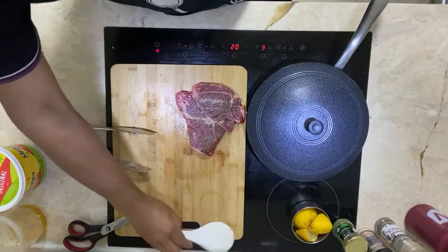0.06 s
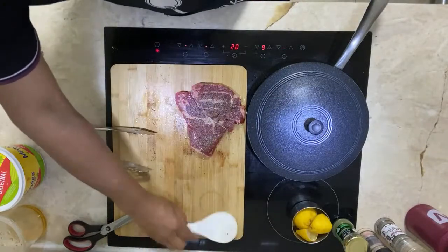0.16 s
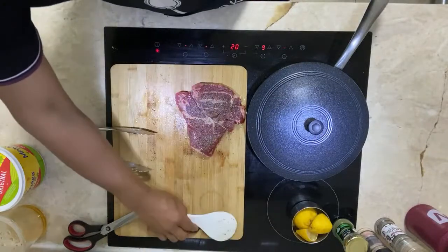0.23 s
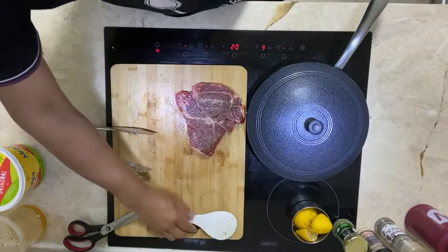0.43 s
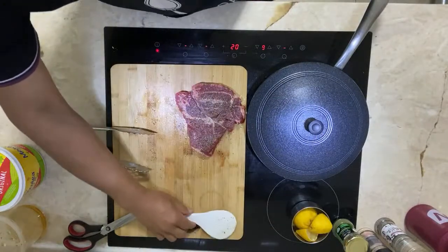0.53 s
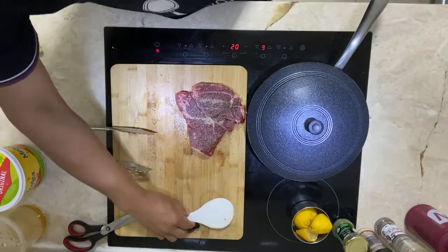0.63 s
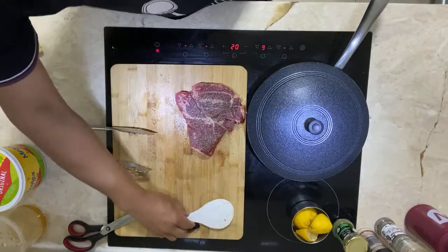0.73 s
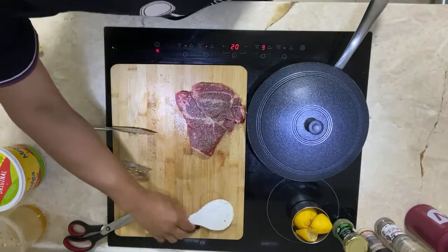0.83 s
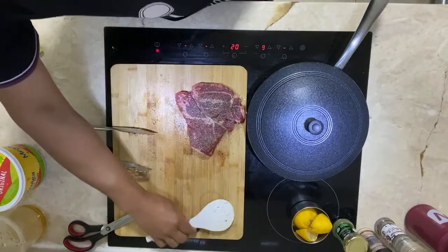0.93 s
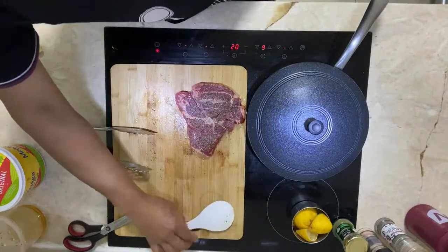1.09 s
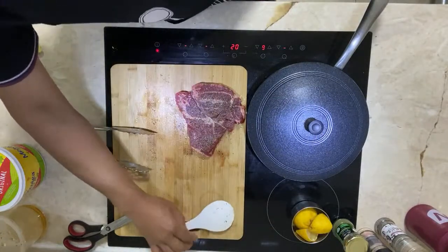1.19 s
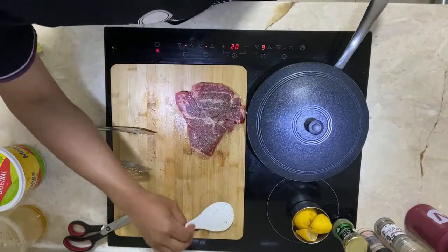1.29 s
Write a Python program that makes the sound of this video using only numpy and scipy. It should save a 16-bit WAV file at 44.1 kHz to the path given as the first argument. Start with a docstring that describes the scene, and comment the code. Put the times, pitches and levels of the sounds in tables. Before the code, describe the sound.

Steady oil sizzle with crackles and bright pops from a covered wok; nearby, a plastic spoon clacks and rattles on a wooden board early and again late. Small hard-walled kitchen, fan noise, thin narrow-band microphone.

```python
"""Wok and spoon in a small kitchen

Hot oil sizzles in a lidded wok: a dense fizz and simmer of tiny swelling pings, dry crackle, and larger
pitched pops with a noisy spit. Beside it a hand shifts a plastic spoon on a wooden cutting board, which
clacks twice and rattles briefly: contacts and slips shake a set of decaying modes.
Early echoes and a short tail off the hard walls lie over fan noise, hiss and a faint hum from the
cooker's fan; the microphone has little bass and a narrow band."""
import sys
import numpy as np
from scipy import signal
from scipy.fft import rfft, irfft
from scipy.io import wavfile

SR = 44100
rng = np.random.default_rng(int(sys.argv[2]) if len(sys.argv) > 2 else 0)


def file_out(sig):
    """Save sig as 16-bit WAV at sys.argv[1]."""
    # one column per channel
    cols = np.atleast_2d(sig).T
    # limit, then scale
    lim = np.clip(cols, -1, 1)
    pcm = np.round(lim * 32767).astype(np.int16)
    wavfile.write(sys.argv[1], SR, pcm)


N = 59535  # length in samples

# how hard the oil boils, for fizz and crackle alike: [t/s, level/dB]
BOIL = [(0, -5.5), (.03, -5), (.045, 1), (.14, -3.5), (.19, 3.5), (.3, -0.5), (.375, -3), (.4, 2.5),
        (.47, 1.5), (.49, -8.5), (.55, 3.5), (.61, -6.5), (.7, 0.5), (.8, -1), (.89, -9.5), (1, 2.5),
        (1.12, 0), (1.35, -6)]
# colour of oil-film snaps and spits: [f/Hz, level/dB]
FILM_COLOUR = [(300, -20), (1500, -12), (2400, -16.5), (4000, 2), (5200, 0), (6400, -6.5), (7500, -3.5),
               (9000, -14)]
# what spoon and board ring with: [f/Hz, level/dB, t60/s]
BOARD_MODES = [(182, -41, 0.1), (300, -35.5, 0.025), (443.3, -23.5, .05), (627, -22, 0.024),
               (809, -21, 0.023), (1073, -22, 0.028), (1355, -20.5, 0.023), (1556, -14.5, 0.017),
               (1855, -11, 0.0081), (1956, -1, 0.0096), (2216, -8.5, 0.019), (2450, -19, .025),
               (2910, -12, .014), (3155, -0.5, 0.0082), (4106, -13, .012), (4586, -17.5, 0.0087),
               (5930, -11, 0.0056), (6820, -27.5, 0.014)]


def pops():
    """Each large bubble tears open with a short spit and gives one slightly rising ping."""
    # larger bubbles bursting in the oil: [t/s, f/Hz at the top of the swell, level/dB]
    bursts = [(.025, 6120, -39), (0.039, 3430, -30), (.044, 5980, -28), (.081, 5500, -40.5),
              (.095, 3475, -26), (0.117, 2540, -32.5), (.129, 6280, -34.5), (0.156, 2610, -27),
              (.163, 6200, -31), (0.1652, 3410, -26), (.184, 4830, -35.5), (0.1954, 3340, -22.5),
              (.199, 6300, -35.5), (.252, 4640, -22.5), (0.334, 5940, -31.5), (.393, 5900, -31),
              (0.4352, 5680, -33.5), (0.4613, 4740, -32), (.462, 3530, -37), (.507, 6670, -33),
              (0.522, 5640, -28.5), (.5235, 5130, -31), (.531, 4880, -26.5), (0.545, 4460, -36),
              (.6015, 6410, -35), (0.6393, 6000, -32.5), (0.6899, 4760, -34), (.7417, 4840, -29.5),
              (0.7553, 3240, -30), (0.7728, 3680, -27), (.8135, 6120, -40), (.816, 3000, -27.5),
              (.849, 3020, -24.5), (0.9233, 6130, -33.5), (.958, 5820, -32.5), (0.9938, 4240, -31),
              (1.0236, 5890, -28.5), (1.087, 6340, -27.5), (1.122, 6160, -30), (1.2275, 3100, -36.5),
              (1.2428, 2830, -31.5), (1.2661, 3030, -29.5)]
    rise_s, glide, roundness = 0.00099, 0.018, 1.24  # glide: share of the pitch gained per rise time
    spit_db, spit_decay_s, spit_lead_s = -8.5, 0.009, 0.0016  # level against the ping, before colouring
    pings, spits = np.zeros((2, N))
    t = np.arange(SR // 20) / SR
    for s, hz, db in bursts:
        add(pings, s, amp(db) * ping(hz, rise_s, glide, roundness))
        spit = np.exp(-t / spit_decay_s) * rng.standard_normal(len(t))
        add(spits, s - spit_lead_s, amp(db + spit_db) * spit)
    return pings + coloured(spits, FILM_COLOUR)


def fizz(count=40):
    """Tiny bubbles of many sizes burst at random, a few much louder than the rest."""
    # balance of the tiny bubbles by pitch: [f/Hz, level/dB]
    balance = [(2400, -5.5), (3200, -11), (4000, -7), (4800, -2), (5400, -17), (6200, -2), (6700, -2.5),
               (7300, -2)]
    level_db, spread_db = -50.5, 4.5  # rms level before the boil curve
    bursts_per_s, rise_s = 1500, 0.0004  # rate of all pitches together; rise before scatter
    out = np.zeros(N)
    for hz in np.linspace(balance[0][0], balance[-1][0], count):
        sizes = amp(spread_db * np.minimum(rng.exponential(1, N), 4))
        bursts = sizes * (rng.random(N) < bursts_per_s / count / SR)
        bubble = ping(hz, rise_s * rng.uniform(0.66, 1.7))
        out += amp(read(balance, hz)) * signal.oaconvolve(bursts, bubble)[:N]
    return evened(out) * amp(level_db + boil_db())


def simmer(count=200):
    """Middling bubbles of nearly one size burst at uneven intervals."""
    level_db, spread_db, bursts_per_s = -41, 5, 85
    centre_hz, scatter_hz, rise_s = 6234, 201, 0.00059
    out = np.zeros(N)
    times = np.cumsum(rng.gamma(2, 1 / 2, count)) / bursts_per_s
    for s, (pitch, size) in zip(times, rng.standard_normal((count, 2))):
        bubble = ping(centre_hz + scatter_hz * pitch, rise_s)
        add(out, s, amp(level_db + spread_db * min(size, 1)) * bubble)
    return out


def crackle():
    """Dry snaps of oil films breaking: random clicks of either sign, coloured by the film spectrum."""
    level_db, spread_db, snaps_per_s = -53.5, 3.5, 300  # rms level before the boil curve
    sizes = amp(spread_db * np.minimum(rng.exponential(1, N), 3))
    snaps = sizes * rng.choice([-1, 1], N) * (rng.random(N) < snaps_per_s / SR)
    return evened(coloured(snaps, FILM_COLOUR)) * amp(level_db + boil_db())


def boil_db():
    """The boil's level in dB at every sample, in straight lines between points."""
    return np.interp(np.arange(N) / SR, *np.transpose(BOIL))


def spoon():
    """Knocks, soft bumps and short drags on the cutting board."""
    return knocks() + bumps() + drags()


def knocks():
    """Each contact of spoon and board excites their modes with its own colour."""
    # [t/s, level/dB, thud/dB, clack near 2 kHz/dB, click near 3.5 kHz/dB, contact time/s]
    contacts = [(.1535, -15.5, -3, -17, -23, 0.00063), (0.2139, -6.5, 2, 5, 0.5, 0.0025),
                (.224, 1.5, -1, 4.5, -4.5, 0.0011), (0.2276, -15, 10, -27.5, 20.5, 0.00077),
                (0.2366, -22, -6, -28, -30, 0.0006), (.364, -30.5, -18, 3.5, -7, 0.002),
                (1.003, -27, -26, -8, 12.5, .002), (1.0599, -7, -7.5, 2.5, 10, 0.003),
                (1.075, -6, 2.5, -12.5, 7.5, .001), (1.0791, -12, 8.5, -1, 8, 0.00035),
                (1.097, -21.5, 5, 1, -13, 0.0016), (1.1574, -7, -5, 3, -25, 0.0025),
                (1.163, -21, 8.5, -13.5, -20, .003), (1.17, -27.5, 0.5, -19.5, -5, 0.0018)]
    # where a contact's colour is set: [f/Hz] of thud, neutral, clack, neutral, click, neutral
    colour_hz = [500, 1250, 1950, 2600, 3500, 6000]
    out = np.zeros(N)
    for s, db, thud_db, clack_db, click_db, contact_s in contacts:
        colour = list(zip(colour_hz, (thud_db, 0, clack_db, 0, click_db, 0)))
        add(out, s, amp(db) * ring(colour, contact_s))
    return out


def ring(colour, contact_s):
    """The modes of spoon and board, weighted by the contact's colour; low modes take longer to build."""
    build_cycles = 1
    t = np.arange(SR // 4) / SR
    out = np.zeros(len(t))
    for k, (hz, db, t60) in enumerate(BOARD_MODES):
        build = 1 - np.exp(-t ** 2 / (contact_s ** 2 + (build_cycles / hz) ** 2))
        decay = amp(db + read(colour, hz) - 60 * t / t60)
        sign = (-1) ** (k // 2)  # modes alternate in polarity, two by two
        out += sign * build * decay * np.sin(2 * np.pi * hz * t)
    return out


def bumps():
    """The hand's soft bumps on the board, each a low ping that swells and dies."""
    # [t/s, level/dB]
    touches = [(.166, -47), (.24, -40), (.482, -47), (0.505, -43), (1.109, -40), (1.241, -51.5)]
    out = np.zeros(N)
    for s, db in touches:
        add(out, s, amp(db) * ping(175.3, rise_s=0.0068))
    return out


def drags():
    """The spoon chatters and drags on the wood in short strokes."""
    # [t/s, length/s, rms level/dB, centre f/Hz]
    strokes = [(0.159, 0.036, -45.5, 647), (.224, 0.01, -31, 5450), (.215, 0.049, -38.5, 438),
               (0.231, 0.044, -38.5, 2800), (0.237, 0.071, -42.5, 1910), (0.331, .04, -50.5, 2040),
               (0.471, 0.057, -55.5, 617), (1.064, 0.062, -42.5, 674), (1.076, 0.028, -32, 3020),
               (1.092, 0.036, -42, 2500), (1.136, 0.022, -39.5, 2550), (1.156, .035, -44, 763),
               (1.234, 0.033, -48.5, 1050), (1.235, 0.062, -54, 594)]
    out = np.zeros(N)
    for s, length_s, db, centre_hz in strokes:
        add(out, s, amp(db) * drag(length_s, centre_hz))
    return out


def drag(length_s, centre_hz):
    """Tiny random slips shake mostly the modes that lie near one pitch."""
    slips_per_s, width_octaves, skirt_db = 430, 0.37, -28.5  # skirt: share added to every mode
    t = np.arange(SR // 8) / SR
    u = np.arange(0, length_s, 1 / SR) / length_s
    slips = rng.choice([-1, 1], N) * (rng.random(N) < slips_per_s / SR)
    body = np.zeros(len(t))
    for hz, _, t60 in BOARD_MODES:
        share = np.exp(-(np.log2(hz / centre_hz) / width_octaves) ** 2) + amp(skirt_db)
        decay = amp(-60 * t / t60) / np.sqrt(t60)
        body += rng.choice([-1, 1]) * share * decay * np.sin(2 * np.pi * hz * t)
    chatter = signal.oaconvolve(slips, body)[len(t):][:len(u)]  # skips the ring's first build-up
    return evened(chatter * np.sqrt(np.sin(np.pi * u)))


def bed():
    """Steady fan noise and distant hiss as shaped noise, with the fan's faint hum as one sine."""
    # spectrum of fan and hiss before levelling: [f/Hz, level/dB]
    spectrum = [(30, -38), (70, -24.5), (120, -15.5), (165, -4.5), (230, 0), (320, -3.5), (700, -8.5),
                (1200, -11.5), (1550, -7), (2000, -14), (3200, -11.5), (4600, -8.5), (6300, 3.5),
                (7300, -10), (9000, -14)]
    noise_db, hum_hz, hum_db = -52.5, 202, -77  # rms levels
    hum = np.sqrt(2) * np.sin(2 * np.pi * hum_hz * np.arange(N) / SR)
    noise = evened(coloured(rng.standard_normal(N), spectrum))
    return amp(noise_db) * noise + amp(hum_db) * hum


def kitchen(x, wet_db, near_db, near_s=0.01, build_s=0.0024):
    """Direct sound, single early echoes, a quick scatter from nearby things, and the room's tail."""
    # how long the room rings: [f/Hz, t60/s]
    reverb_time = [(150, 0.55), (400, 0.3), (1000, 0.39), (2500, 0.3), (7000, 0.17)]
    # echoes off worktop and nearby walls: [delay/s, share]
    early = [(.0037, 0.26), (.0058, 0.084), (0.0116, 0.077), (0.0188, .09)]
    t = np.arange(SR // 2) / SR
    tail_noise, near_noise = rng.standard_normal((2, len(t)))
    hz, at, z = signal.stft(tail_noise, SR, nperseg=256)
    decay = amp(-60 * at / read(reverb_time, hz)[:, None])
    tail = signal.istft(z * decay, SR, nperseg=256)[1][:len(t)]
    build = 1 - np.exp(-(t / build_s) ** 2)
    tail = tail * build
    near = near_noise * build * np.exp(-t / near_s)
    response = amp(wet_db) * tail / np.linalg.norm(tail)
    response += amp(near_db) * near / np.linalg.norm(near)
    for s, share in [(0.00038, 0.99)] + early:  # the direct sound comes first
        add(response, s, np.array([share]))
    return signal.fftconvolve(x, response)[:N]


def ping(hz, rise_s, glide=0, swell=1):
    """A tone that swells for one rise time and dies away; it passes hz at the top of the swell."""
    u = np.arange(0, 10 * rise_s, 1 / SR) / rise_s
    envelope = (u * np.exp(1 - u)) ** swell
    return envelope * np.sin(2 * np.pi * hz * rise_s * (u + glide * u * (u / 2 - 1)))


def coloured(x, points):
    """Filters by a spectrum given as frequency and dB."""
    gain = amp(read(points, np.fft.rfftfreq(2 * N, 1 / SR)))
    return irfft(rfft(x, 2 * N) * gain)[:N]


def read(points, hz):
    """Reads a curve on a log-frequency axis."""
    f, value = np.transpose(points)
    return np.interp(np.log(hz + 1), np.log(f + 1), value)


def add(mix, s, sound):
    """Mixes a sound in at time s."""
    part = mix[max(round(s * SR), 0):][:len(sound)]
    part += sound[:len(part)]


def evened(x):
    """Scales to an rms of one."""
    return x / np.sqrt(np.mean(x ** 2) + 1e-20)


def amp(db):
    """Decibels to gain."""
    return 10 ** (np.asarray(db) / 20)


def scene():
    """The wok and the board in one kitchen, the board with less room on it, over the steady bed."""
    wok = kitchen(pops() + simmer() + fizz() + crackle(), wet_db=-8.5, near_db=-7.5)
    board = kitchen(spoon(), wet_db=-12.5, near_db=-9)
    return (wok + board + bed())[None]


def record(dry):
    """A microphone with little bass and a narrow band, which rounds off the loudest peaks."""
    # response of the microphone: [f/Hz, level/dB]
    response = [(20, -17.5), (70, -13.5), (150, -1.5), (6600, 0.5), (7200, -12.5), (8000, -19.5),
                (9500, -22.5)]
    rounded = 0.96 * dry[0] / (1 + abs(dry[0]) ** 8) ** (1 / 8)
    heard = coloured(rounded, response)
    band_edge = signal.firwin(127, 8900, window=("kaiser", 9), fs=SR)  # low-pass, edge in Hz
    return signal.oaconvolve(heard, band_edge, "same")[None]


dry = scene()
out = record(dry)
file_out(out)
```